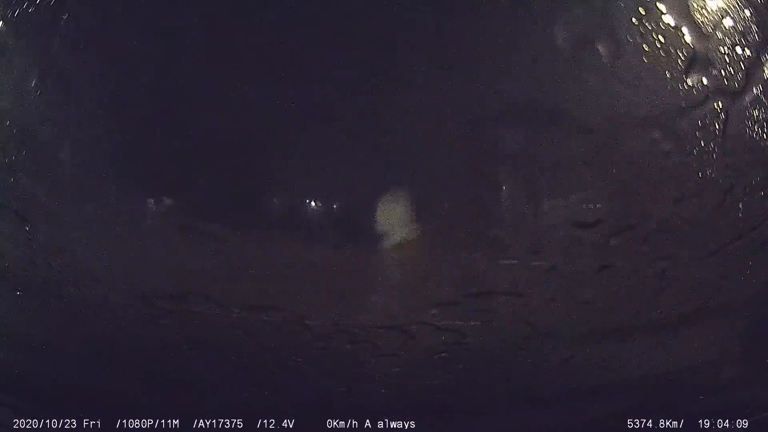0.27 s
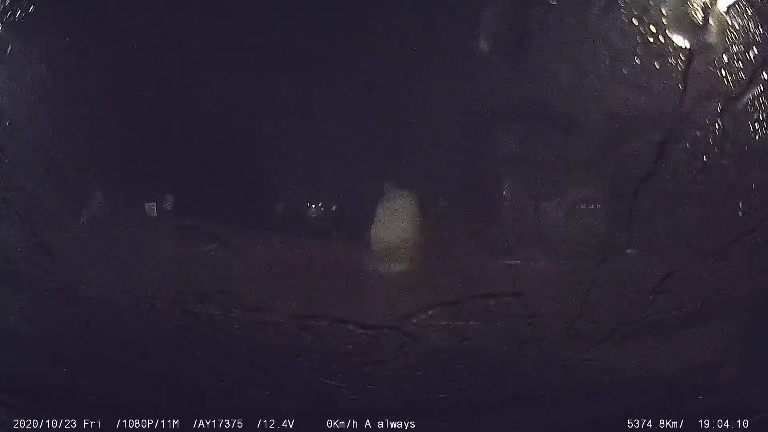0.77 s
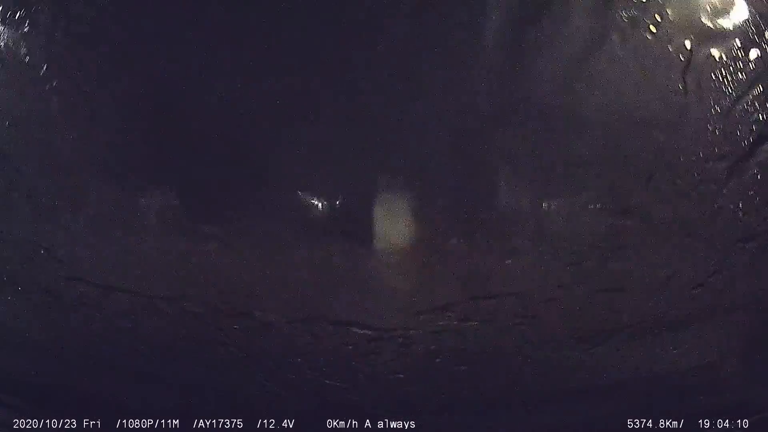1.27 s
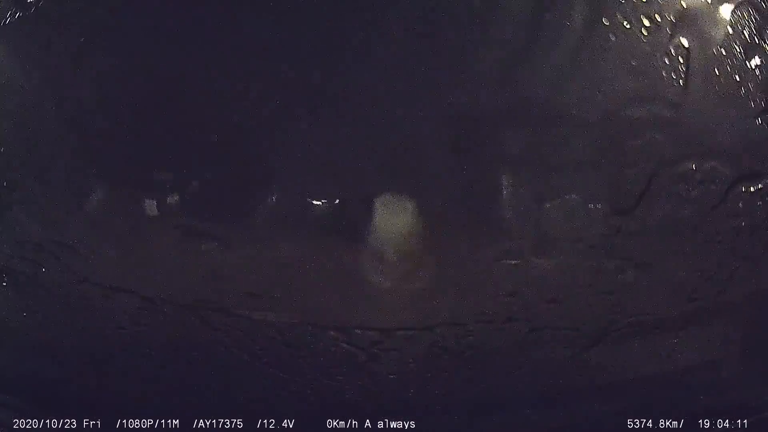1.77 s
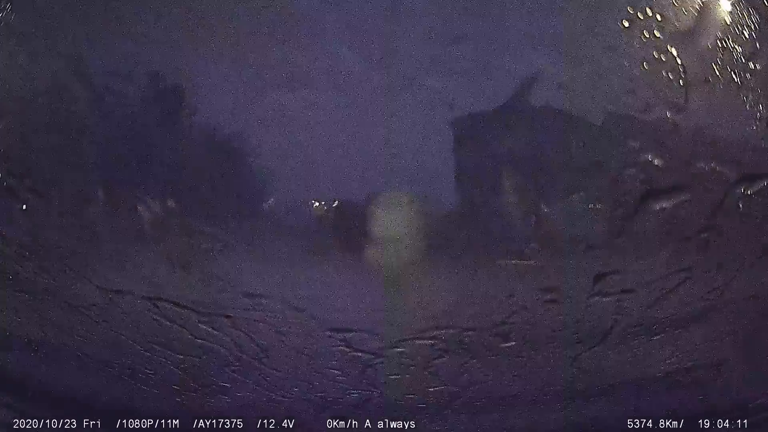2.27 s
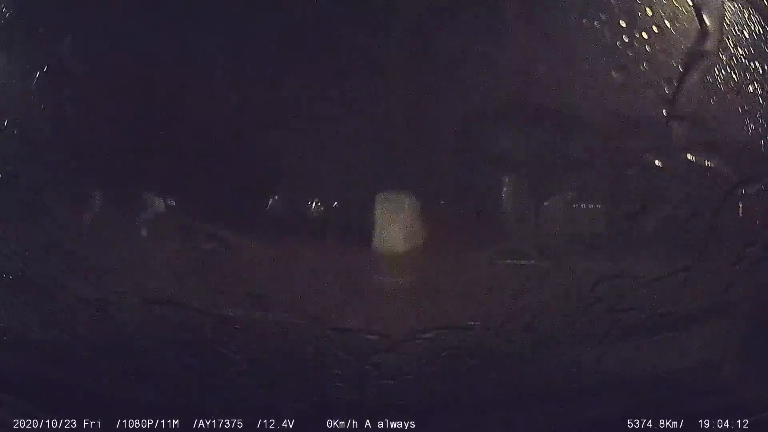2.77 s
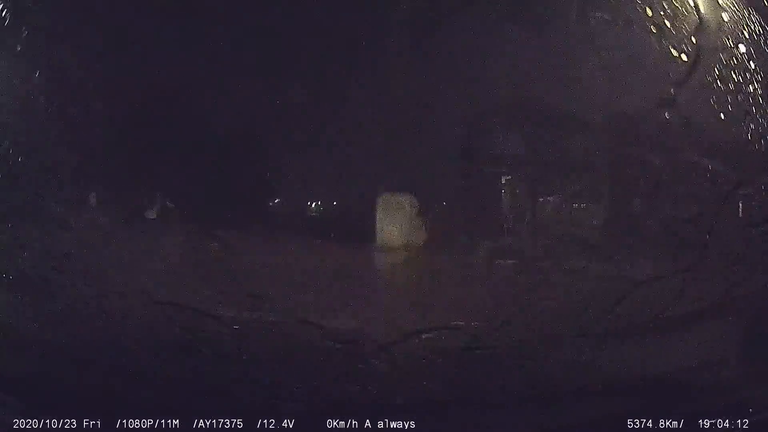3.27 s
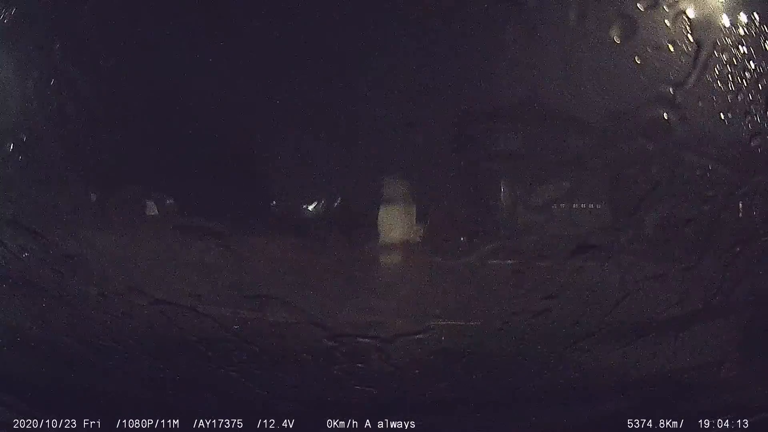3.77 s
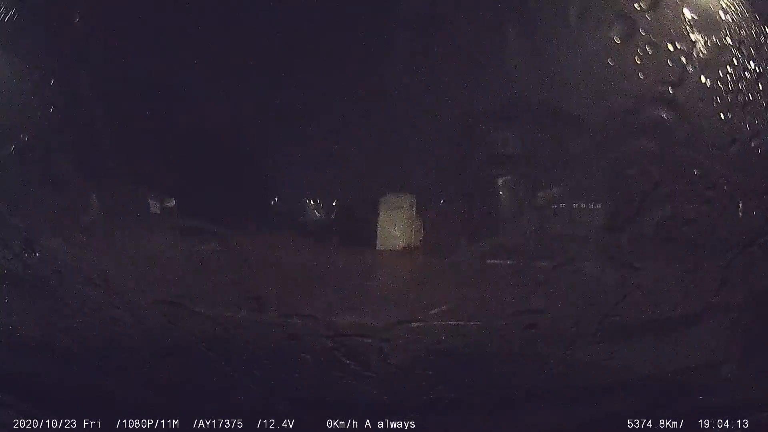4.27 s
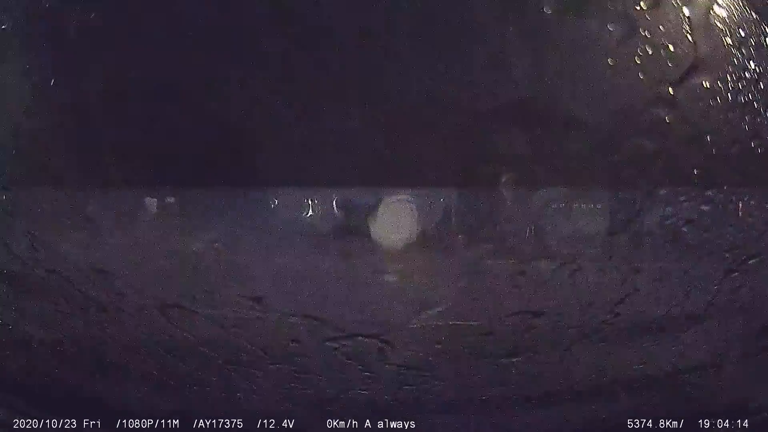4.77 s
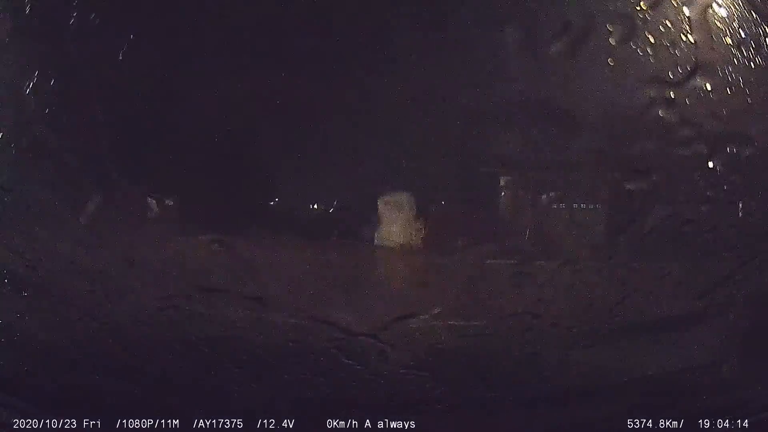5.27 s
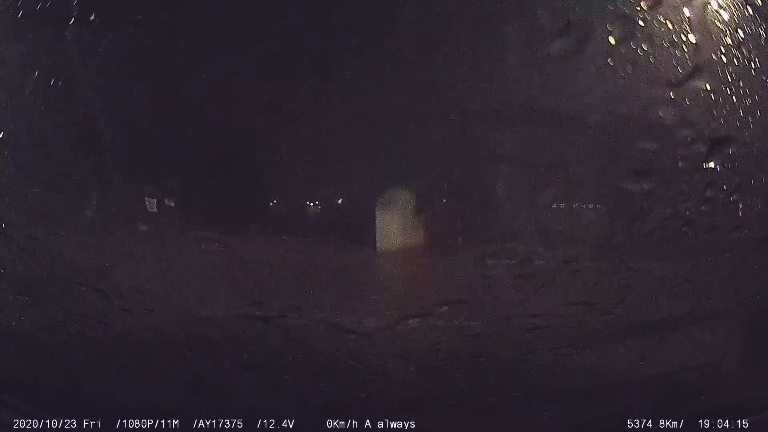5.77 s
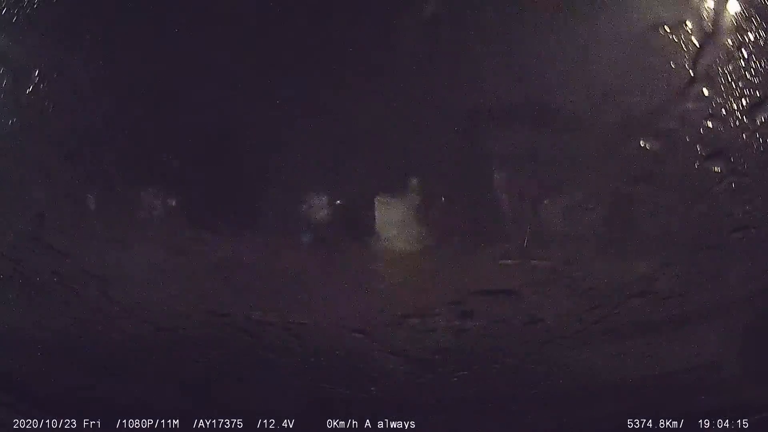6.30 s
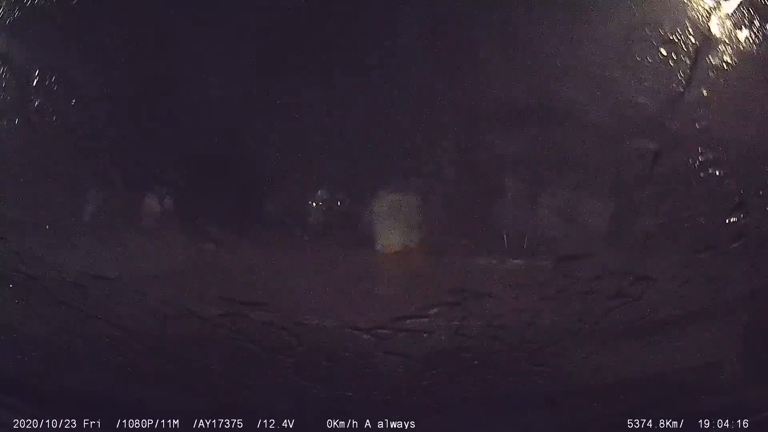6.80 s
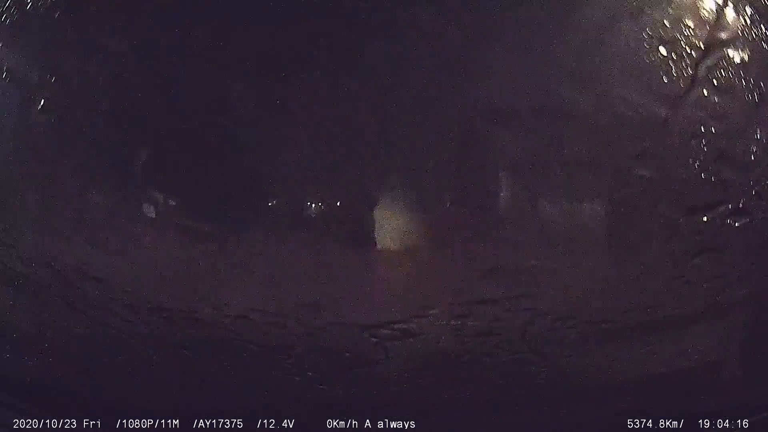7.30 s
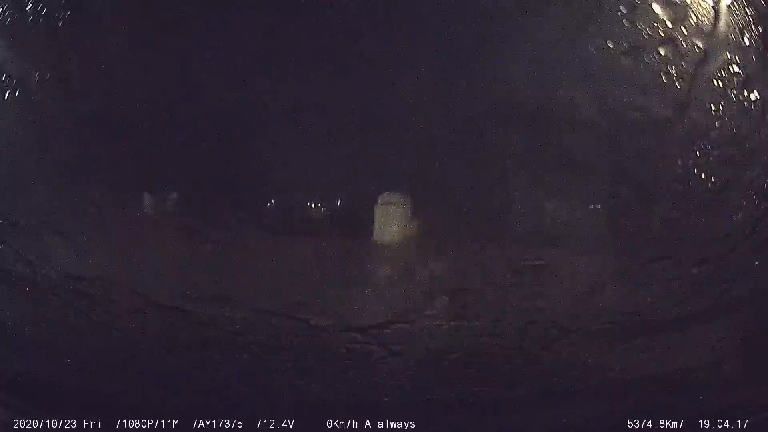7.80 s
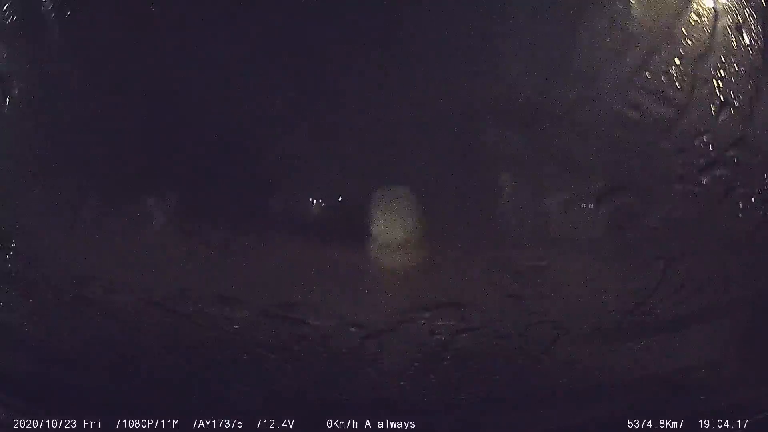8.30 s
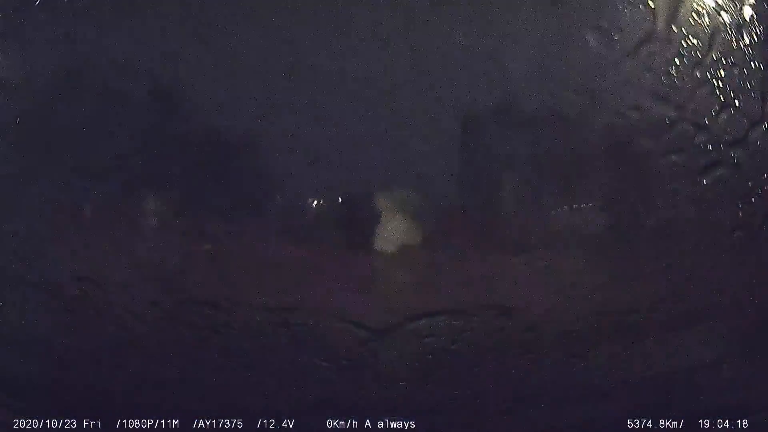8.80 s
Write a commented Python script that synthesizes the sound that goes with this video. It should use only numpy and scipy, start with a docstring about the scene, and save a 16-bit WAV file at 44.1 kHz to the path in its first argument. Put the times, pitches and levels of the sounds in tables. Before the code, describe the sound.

Heavy rain drums on a parked car's roof and windscreen, heard from inside, with scattered hard hailstone knocks, easing mid-way then swelling before slackening.

```python
"""Heavy rain and hail on a parked car, heard from inside by a small camera behind the windscreen.
From the start, thousands of random drops drum and patter in gusts over steady spray, ice grit and a low rumble.
Hailstones soon knock on the body and ice pellets tick on the windscreen: noise rings coloured by the cabin.
Dull thumps of filtered noise join from 1.6 s. The rain eases after 3 s, swells hardest near 6.7 s,
then slackens to the end as the last stones and pellets land."""
import sys
import numpy as np
from scipy import signal
from scipy.fft import rfft, irfft
from scipy.io import wavfile

SR = 44100
rng = np.random.default_rng(int(sys.argv[2]) if len(sys.argv) > 2 else 0)


def file_out(sig):
    """Save sig as 16-bit WAV at sys.argv[1]."""
    # one column per channel
    cols = np.atleast_2d(sig).T
    # limit, then scale
    lim = np.clip(cols, -1, 1)
    pcm = np.round(lim * 32767).astype(np.int16)
    wavfile.write(sys.argv[1], SR, pcm)


N = 399105
TIME = np.arange(N) / SR


def undb(db):
    """Decibels to gain."""
    return 10 ** (np.asarray(db) / 20)


def unit(x):
    """Scale to rms 1."""
    return x / np.sqrt(np.mean(x ** 2) + 1e-20)


def add(out, start_s, x):
    """Mix x into out from start_s on."""
    i = max(int(start_s * SR), 0)
    out[i:i + len(x)] += x[:max(len(out) - i, 0)]


def spectrum_db(points, hz):
    """Join (freq_hz, level_db) points on a log-frequency axis."""
    freq_hz, level_db = np.transpose(points)
    return np.interp(np.log(hz + 1), np.log(freq_hz), level_db)


# how roof, glass and trim pass an impact inside, as a relative tone curve: freq_hz, level_db
CABIN_TONE = [(60, -16.5), (110, -4.5), (190, -0.5), (290, -5), (410, -2), (540, -1), (900, -2),
              (1350, 0.5), (1950, -5), (2250, -12), (2640, -20.5), (3400, -21.5), (4050, -30), (6600, -26),
              (7600, -32)]
# peaks and dips from panels, glass and cabin air: freq_hz, width_hz, gain_db
CABIN_MODES = [(219.3, 24, 4.5), (333.4, 26, 6), (490, 23, 3.5), (760, 61, 3.5), (847, 68, -4.5),
               (1198, 28, 1.5), (1310, 30, 1.5), (1543, 81, -3.5), (1630, 71, 1), (5150, 940, 9)]


def cabin(band, size=4096, order=12):
    """Cabin response within one range: tone curve plus modes, made causal (minimum phase) by folding the cepstrum."""
    low_hz, high_hz = band
    hz = np.arange(size // 2 + 1) * SR / size + 1
    db = spectrum_db(CABIN_TONE, hz)
    for freq_hz, width_hz, gain_db in CABIN_MODES:
        db = db + gain_db / (1 + (2 * (hz - freq_hz) / width_hz) ** 2)
    low_edge = 1 + (low_hz / hz) ** (2 * order)
    high_edge = 1 + (hz / high_hz) ** (2 * order)
    db = db - 10 * np.log10(low_edge * high_edge)
    cepstrum = irfft(np.log(undb(db) + 1e-4))
    cepstrum[1:size // 2] *= 2
    cepstrum[size // 2 + 1:] = 0
    return irfft(np.exp(rfft(cepstrum)))[:size // 2]


def ring(decay_s, build, crack, tail_db, tail_s, size=4096):
    """One spot of a panel: a direct crack, bending waves that build and die fast, then weak cabin reflections."""
    t = np.arange(size) / SR
    panel = np.exp(-t / decay_s) * (1 - np.exp(-t / (build * decay_s + 1e-5)))
    echoes = undb(tail_db) * np.exp(-t / tail_s) * (1 - np.exp(-t / 0.0026))
    return crack * (t == 0) + rng.standard_normal(size) * np.hypot(panel, echoes)


def resonate(x, hz, q, boost_db):
    """Lift the main mode of the struck spot by adding a resonant band to the sound."""
    return x + undb(boost_db) * signal.lfilter(*signal.iirpeak(hz, q, fs=SR), x)


# strength of the downpour: start_s, strength_db
GUST_POINTS = [(0.0, -30), (0.5, -31), (0.66, -31), (0.78, -29), (1.11, -27), (1.36, -29), (1.53, -29),
               (1.89, -27), (2.34, -32), (2.79, -30), (3.0, -35), (3.12, -36), (3.28, -36), (3.65, -31),
               (4.31, -31), (4.61, -36), (4.84, -36), (5.34, -33), (5.72, -36), (5.95, -34), (6.4, -28),
               (6.5, -25), (6.6, -24), (6.75, -23), (7.08, -27), (7.49, -25), (7.66, -29), (7.84, -30),
               (8.22, -29.5), (8.57, -35.5), (9.05, -35.5)]
USUAL_DB = -31  # the strength counted as usual


def downpour():
    """Gust strength through time, in dB above the usual strength."""
    return np.interp(TIME, *np.transpose(GUST_POINTS)) - USUAL_DB


# ranges of the rain's drumming, patter and splash: low_hz, high_hz
RAIN_RANGES = [(90, 1000), (1000, 4000), (2900, 8000)]
# drumming, patter and splash: level_db at usual strength, growth (dB per dB of gust), decay_s,
# scatter_db of drop sizes
RAIN_LAYERS = [(-31, .85, 0.0058, 4), (-35, 1.22, .0042, 4.5), (-59, 1.17, 0.0023, 5.5)]
# drops landing each second at the usual strength, and the growth of that rate (dB per dB of gust)
DROPS_PER_S, DROPS_GROWTH = 1250, .85


def rain(colours, gust_db, count=18):
    """Drops of all sizes land at random on many spots and ring each range; stronger gusts bring more."""
    rate = DROPS_PER_S * undb(DROPS_GROWTH * gust_db)
    layers = np.zeros((len(colours), N))
    for _ in range(count):
        lands = np.flatnonzero(rng.random(N) < rate / count / SR)
        weight = np.minimum(rng.standard_exponential(len(lands)), 4.2)
        pitch_hz = 1100 * 2 ** rng.uniform(-0.64, 1)
        for layer, colour, (_, _, decay_s, scatter_db) in zip(layers, colours, RAIN_LAYERS):
            # a heavy drop is loud in every range, but each splashes in its own way
            splash_db = 2.1 * rng.standard_normal(len(lands))
            sign = rng.choice([-1, 1], len(lands))
            blows = np.zeros(N)
            blows[lands] = undb(scatter_db * weight + splash_db) * sign
            spot = ring(decay_s, build=0.13, crack=4.46, tail_db=-9, tail_s=0.016)
            spot = resonate(spot, pitch_hz, q=4.8, boost_db=-4)
            drop = unit(signal.fftconvolve(spot, colour))
            layer += signal.oaconvolve(blows, drop)[:N]
    out = np.zeros(N)
    for layer, (level_db, growth, _, _) in zip(layers, RAIN_LAYERS):
        # even out the changing drop rate, so that growth alone sets the swell
        steady = unit(layer / np.sqrt(rate))
        out += steady * undb(level_db + growth * gust_db)
    return out


def spray(colour, level_db=-68.5):
    """Fine spray hisses on the glass as steady coloured noise, even through the lulls."""
    return unit(signal.oaconvolve(rng.standard_normal(N), colour)[:N]) * undb(level_db)


# tone of the storm rumble, as relative levels: freq_hz, level_db
RUMBLE_TONE = [(12, -21.5), (25, -2.5), (36, -6), (55, -3.5), (75, -8.5), (120, -12), (250, -22.5),
               (600, -52.5)]


def rumble(gust_db, level_db=-43.5, growth=.25):
    """Low storm noise comes through the closed body and rises a little with the gusts (growth in dB per dB)."""
    hz = np.arange(N // 2 + 1) * SR / N
    noise = rfft(rng.standard_normal(N))
    shaped = irfft(noise * undb(spectrum_db(RUMBLE_TONE, hz)), N)
    return unit(shaped) * undb(level_db + growth * gust_db)


# ice grit: grains per second, overall level, scatter of sizes, ring time constant
GRIT_PER_S, GRIT_DB, GRIT_SCATTER_DB, GRIT_RING_S = 52, -69, 5.5, 0.002


def grit(colour, count=8):
    """Fine grains of ice land at random on several spots of the glass, each a light, short ring."""
    out = np.zeros(N)
    for _ in range(count):
        lands = rng.random(N) < GRIT_PER_S / count / SR
        sizes = undb(GRIT_SCATTER_DB * np.minimum(rng.standard_exponential(N), 2.5))
        spot = ring(GRIT_RING_S, build=.08, crack=4, tail_db=-14.5, tail_s=.012)
        grain = unit(signal.fftconvolve(spot, colour))
        out += signal.oaconvolve(lands * sizes, grain)[:N]
    return unit(out) * undb(GRIT_DB)


def strike(colour, level_db, decay_s, build, pitch_hz):
    """One range of a blow of ice on a ringing spot; its level is the energy spread over 25 ms."""
    blow_samples = .025 * SR
    spot = ring(max(decay_s, .001), build, crack=4.7, tail_db=-16.0, tail_s=0.02)
    hit = signal.fftconvolve(resonate(spot, pitch_hz, q=7.6, boost_db=1.5), colour)
    return hit * np.sqrt(blow_samples / np.sum(hit ** 2)) * undb(level_db)


# hailstones on the body: start_s, strength_db, hardness (tilt in dB per octave), decay_s,
# pitch_hz of the struck spot
HAILSTONES = [(0.0155, -38, -2, 0.01, 1700), (0.1163, -35.5, -4, 0.012, 900), (0.2065, -21, 1, 0.012, 1380),
              (0.603, -31, -1, 0.022, 1090), (0.6274, -27, 4, 0.0018, 750), (0.765, -25.5, 2, 0.008, 1960),
              (1.0736, -20, 0.2, 0.013, 1060), (1.1467, -32, 2.5, 0.002, 695),
              (1.218, -30.5, -2.5, 0.01, 860), (1.568, -32.5, -2, 0.0068, 1090),
              (1.584, -25.5, 0.3, 0.015, 2150), (1.8633, -28.5, 1, 0.0068, 710),
              (1.9308, -32.5, 3, 0.0076, 517), (2.551, -39, 0.5, 0.003, 2140),
              (2.862, -34.5, -2, 0.034, 1360), (3.4142, -24, 0.6, 0.01, 716),
              (3.568, -37, 6.5, 0.0043, 1600), (3.6659, -30.5, 0, 0.017, 1280),
              (3.7707, -22, 1, 0.0083, 1440), (3.8723, -26, -0.1, 0.012, 2400),
              (4.016, -36, 0.5, 0.0054, 1890), (4.0898, -37.5, 3, 0.013, 2350),
              (4.2021, -31, -2.5, 0.012, 2430), (4.3407, -34, 4, 0.0043, 630),
              (4.4596, -35.5, -0.5, 0.0084, 1970), (4.823, -43, -6.5, 0.017, 1760),
              (5.3395, -27.5, 0.7, 0.0045, 2430), (5.443, -30, 0.7, 0.012, 2270),
              (5.7484, -46, -5, 0.01, 1200), (5.897, -41, -2.5, 0.0099, 1050),
              (6.2748, -27.5, 0, 0.0095, 1630), (6.379, -26.5, 3.5, 0.02, 630),
              (6.523, -28.5, -0.5, 0.025, 1120), (6.639, -31, -1, 0.017, 1180),
              (6.672, -33.5, -1.5, 0.0081, 1210), (6.806, -40.5, -5.5, 0.0053, 760),
              (6.9452, -26.5, 1, 0.0076, 800), (7.3426, -32.5, -2, 0.012, 950),
              (7.6126, -18.5, -1, 0.011, 1510), (7.8525, -33.5, 4, 0.0088, 1200),
              (8.1176, -31, 0, 0.004, 1180), (8.1639, -36.5, 1, 0.0045, 1320),
              (8.4869, -41, -3.5, 0.018, 1220), (8.9372, -29.5, 2, 0.0082, 616)]
# ranges of an ice blow's thud, knock, clack and tick: low_hz, high_hz
ICE_RANGES = [(200, 1000), (1000, 2300), (2300, 3900), (3900, 8000)]
# a stone's thud, knock, clack and tick: level_db added to its strength, build (share of decay_s)
STONE_LAYERS = [(3, .25), (-1.5, 0.22), (-9.5, 0.11), (-18, 0.062)]
# the struck spot favours a broad range about its pitch; hardness tilts the sound about a pivot
SPOT_DB, SPOT_OCTAVES, PIVOT_HZ = 8, 1.04, 1480


def hail(colours):
    """Each stone cracks and rings most near its spot's pitch; harder stones are brighter."""
    out = np.zeros(N)
    centres_hz = np.sqrt(np.prod(ICE_RANGES, axis=1))
    for start_s, strength_db, tilt_db, decay_s, pitch_hz in HAILSTONES:
        for colour, hz, (layer_db, build) in zip(colours, centres_hz, STONE_LAYERS):
            spot_db = SPOT_DB * np.exp(-(np.log2(hz / pitch_hz) / SPOT_OCTAVES) ** 2)
            hard_db = tilt_db * np.log2(hz / PIVOT_HZ)
            level_db = strength_db + layer_db + spot_db + hard_db
            add(out, start_s, strike(colour, level_db, decay_s, build, pitch_hz))
    return out


# small ice pellets on the windscreen: start_s, strength_db
ICE_PELLETS = [(0.149, -46), (0.688, -46), (0.751, -45.5), (0.9874, -41.5), (1.303, -45.5), (1.488, -51),
               (1.804, -52.5), (2.1535, -45), (2.37, -44), (2.6703, -47.5), (3.117, -58), (3.137, -56),
               (3.3848, -47), (4.2668, -43), (4.291, -54), (4.439, -53), (4.517, -55.5), (5.1872, -47),
               (6.114, -51), (6.241, -44), (6.49, -46.5), (6.795, -48), (8.3498, -54), (9.032, -56)]
# a pellet's thud, knock, clack and tick, in dB added to its strength
PELLET_DB = (8, 3.5, 1, 0.46)
GLASS_RING_S, GLASS_HZ = 0.0045, 458  # time constant and main mode of the glass


def pellets(colours):
    """Small pellets tick on the windscreen: all share one balance of ranges and the glass's short ring."""
    out = np.zeros(N)
    for start_s, strength_db in ICE_PELLETS:
        for colour, layer_db in zip(colours, PELLET_DB):
            hit = strike(colour, strength_db + layer_db, GLASS_RING_S, build=.08, pitch_hz=GLASS_HZ)
            add(out, start_s, hit)
    return out


# dull thumps of the body: peak_s, pitch_hz, level_db, length_s (from the peak down to 1/e)
BODY_THUMPS = [(1.64, 80, -31.5, 0.021), (3.58, 168, -31.5, 0.018), (6.457, 93, -36.5, 0.067),
               (7.001, 157, -30, 0.028)]


def thumps():
    """Soft thumps of the body: narrow low noise under a smooth bell-shaped swell."""
    out = np.zeros(N)
    for peak_s, pitch_hz, level_db, length_s in BODY_THUMPS:
        edges_hz = [pitch_hz * .8, pitch_hz * 1.25]
        band = signal.butter(2, edges_hz, "band", fs=SR, output="sos")
        body = signal.sosfilt(band, rng.standard_normal(N))
        swell = np.exp(-((TIME - peak_s) / length_s) ** 2)
        body_rms = np.sqrt(np.average(body ** 2, weights=swell ** 2))
        out += body * swell * undb(level_db) / body_rms
    return out


def scene():
    """Rain, hail and rumble inside the car."""
    gust_db = downpour()
    rain_colours = [cabin(band) for band in RAIN_RANGES]
    ice_colours = [cabin(band) for band in ICE_RANGES]
    glass = ice_colours[-1]
    water = rain(rain_colours, gust_db) + spray(glass)
    storm = rumble(gust_db) + thumps()
    ice = grit(glass) + hail(ice_colours) + pellets(ice_colours)
    return (water + storm + ice)[None]


def record(dry):
    """The camera rounds the hardest blows, has a deep notch in the treble and a low cut-off."""
    ceiling, notch_hz, top_hz = .68, 4000, 7650
    rounded = dry / (1 + (dry / ceiling) ** 4) ** .25
    notched = signal.lfilter(*signal.iirnotch(notch_hz, 3.3, fs=SR), rounded)
    return signal.sosfilt(signal.ellip(10, .3, 70, top_hz, fs=SR, output="sos"), notched)


dry = scene()
out = record(dry)
file_out(out)
```